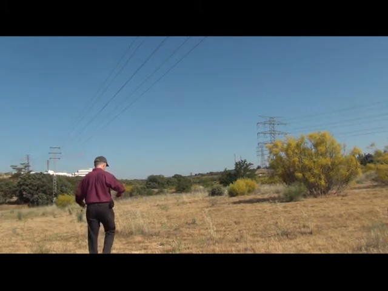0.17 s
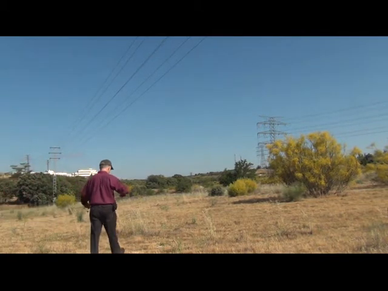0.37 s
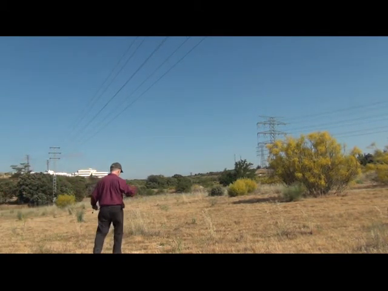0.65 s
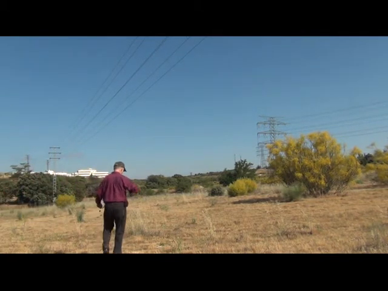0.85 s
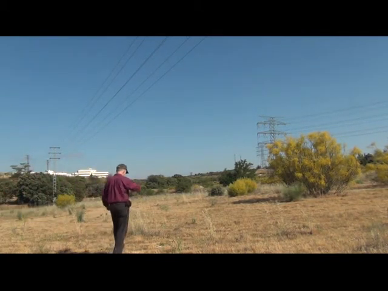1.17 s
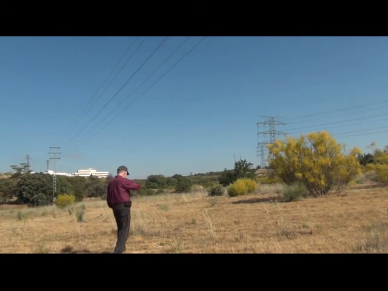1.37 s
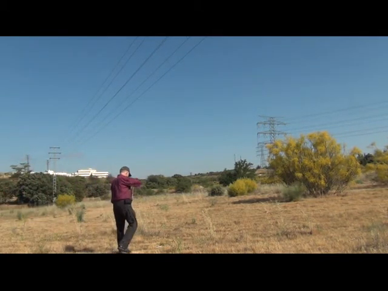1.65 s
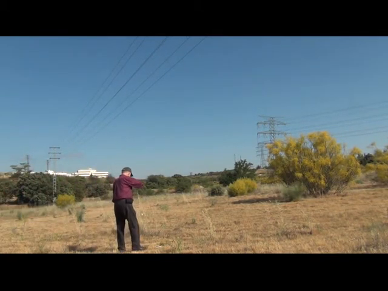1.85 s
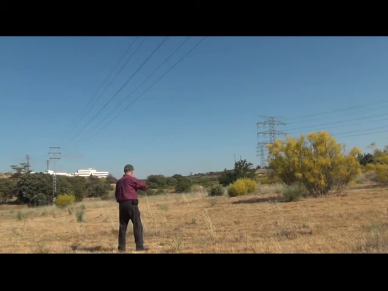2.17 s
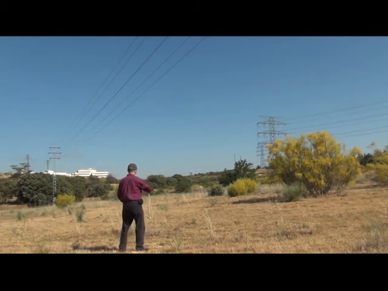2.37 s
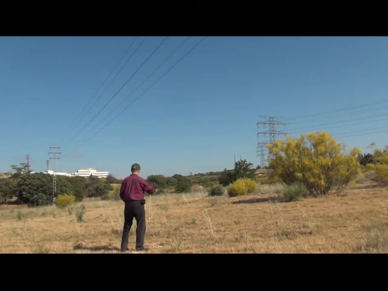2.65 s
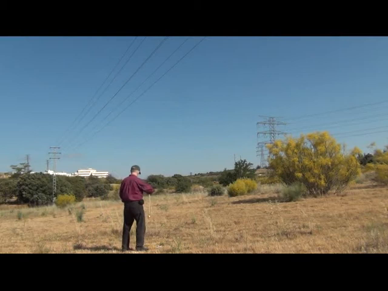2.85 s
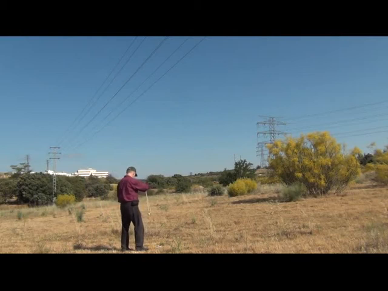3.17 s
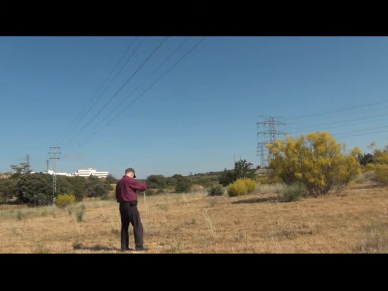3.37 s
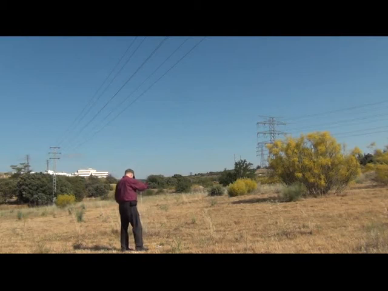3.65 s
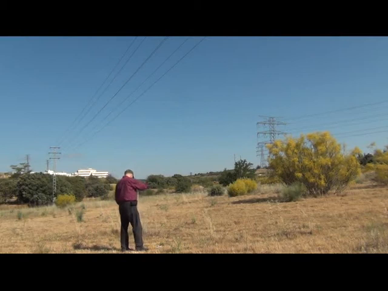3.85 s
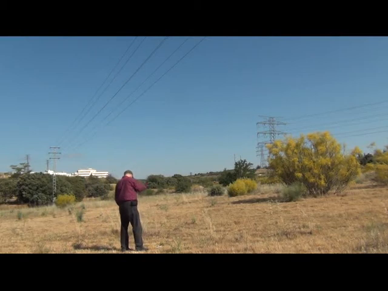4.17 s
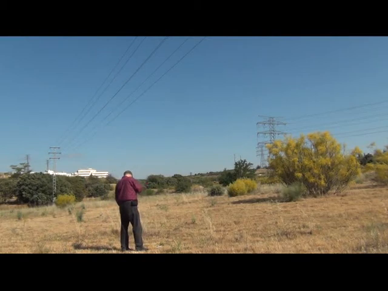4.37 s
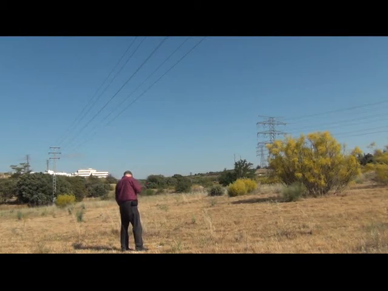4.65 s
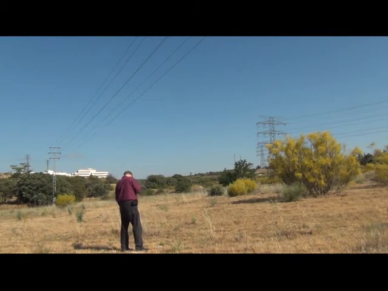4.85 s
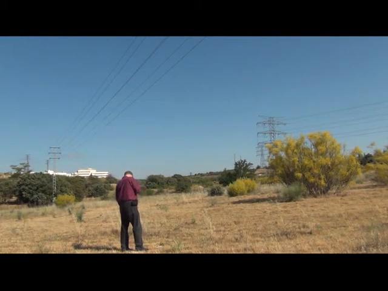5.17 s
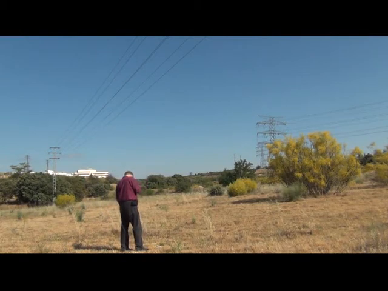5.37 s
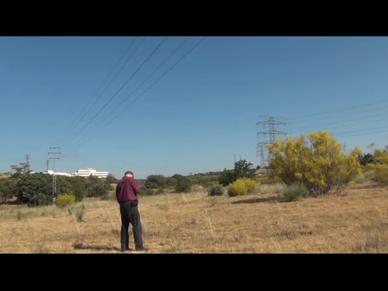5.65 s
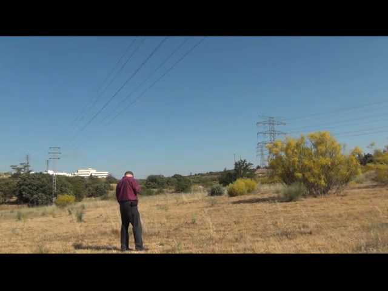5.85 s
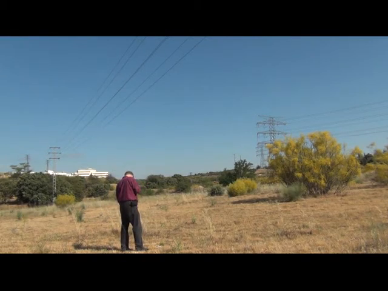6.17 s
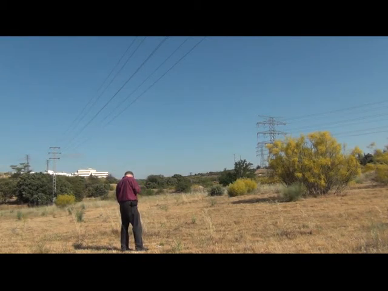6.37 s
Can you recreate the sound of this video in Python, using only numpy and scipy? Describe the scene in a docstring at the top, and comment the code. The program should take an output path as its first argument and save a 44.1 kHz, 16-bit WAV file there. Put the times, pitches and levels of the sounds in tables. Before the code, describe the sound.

A man walks away over dry straw, faint brushing and snapping stalks, with small bird slurs and whistles. He halts and raises his arms. A breeze rumbles, then two loud dry gunshots burst on the left, crackling reflections spreading to the centre and fading across the open field. Low, fluttering gusts buffet the unsheltered stereo microphone, with brief bird chirps beneath.

```python
"""Over far country murmur, hiss and a faint electronic whistle, a walker's steps swish and snap in dry grass.
A small bird sings a phrase of slurs and whistles, then chirps here and there: gliding, rasping sines.
Two gunshots crack from the left: filtered shocks, each answered by noise clumps and echoes at set delays
off scrub, trees and a far slope. Wind, heard throughout as shaped noise, buffets the stereo microphone
hardest after the shots, with pressure dips of single eddies."""
import sys
import numpy as np
from scipy import signal
from scipy.fft import rfft, irfft, next_fast_len
from scipy.io import wavfile
from scipy.ndimage import map_coordinates

SR = 44100
rng = np.random.default_rng(int(sys.argv[2]) if len(sys.argv) > 2 else 0)


def store_wav(level_fs):
    """Save 16-bit WAV to argv[1]."""
    pcm = np.round(np.clip(np.atleast_2d(level_fs), -1, 1) * 32767)
    wavfile.write(sys.argv[1], SR, pcm.T.astype(np.int16))


N = 287532
TIME = np.arange(N) / SR


def amp(db):
    """Decibels to gain."""
    return 10 ** (np.asarray(db) / 20)


def unit(x):
    """Scale to rms 1."""
    return x / np.sqrt(np.mean(x ** 2) + 1e-20)


def along(points, hz):
    """Read (Hz, value) points on a log axis."""
    f, v = np.transpose(points)
    return np.interp(np.log(hz + 1), np.log(f + 1), v)


def curves(rows):
    """One value per sample for each column after the time."""
    s, *cols = np.transpose(rows)
    return [np.interp(TIME, s, c) for c in cols]


def wobble(rate_hz):
    """A smooth random curve, rate_hz knots a second."""
    knots = rng.standard_normal(int(N * rate_hz / SR) + 4)
    return map_coordinates(knots, [TIME * rate_hz])


def swell(peak_s, half_s, db):
    """Power of one bell-shaped swell."""
    return amp(db) ** 2 * np.exp(-((TIME - peak_s) / half_s) ** 2)


def filtered(x, response):
    """x times a complex response of frequency."""
    m = next_fast_len(x.shape[-1] + 8192, True)
    spectrum = rfft(x, m) * response(np.fft.rfftfreq(m, 1 / SR))
    return irfft(spectrum, m)[..., :x.shape[-1]]


def noise(spectrum, size, grain_db=0):
    """Coloured noise of rms 1; grain_db makes single wavelets stand out."""
    white, sizes = rng.standard_normal((2, size))
    return unit(filtered(white * amp(grain_db * sizes), lambda hz: amp(along(spectrum, hz))))


def wide(spectrum, alike):
    """Stereo noise of rms 1; the mid-side balance sets the left-right likeness at each frequency."""
    def response(hz):
        turn = np.arccos(np.clip(along(alike, hz), -1, 1)) / 2
        return amp(along(spectrum, hz)) * [np.cos(turn), np.sin(turn)]

    mid, side = filtered(rng.standard_normal((2, N)), response)
    return unit(np.array([mid + side, mid - side]))


def add(track, s, x):
    """Mix x into track from second s on."""
    start = max(round(s * SR), 0)
    part = track[..., start:start + x.shape[-1]]
    part += x[..., :part.shape[-1]]


def background():
    """Far country murmur and microphone hiss as stereo noise, and a thin electronic whistle as a sine."""
    # Spectrum of murmur and hiss. Each row: frequency in Hz, relative density in dB.
    air_spectrum = [(15, -32), (25, -8), (103, 1.5), (196, -6), (293, -6), (373, -8), (415, -6), (488, -7),
                    (529, -6.5), (655, -5.5), (927, -5.5), (2240, -14.5), (15000, -22.5)]
    # Slow swell of the air noise. Each row: time in seconds, gain in dB.
    air_swell = [(0, 2), (1.4, 1.5), (2.2, 0), (3, 0.5), (6.5, 4)]
    # Likeness of the two ports in still air. Each row: frequency in Hz, correlation (0 to 1).
    air_alike = [(60, 1), (180, 0.94), (550, 0.64), (1650, 0.44), (4970, 0.5), (15000, 0.79)]
    air_db, whistle_rms_db, whistle_hz = -56, -72, 15625
    air = amp(air_db + curves(air_swell)[0]) * wide(air_spectrum, air_alike)
    whistle = amp(whistle_rms_db) * np.sqrt(2) * np.sin(2 * np.pi * whistle_hz * TIME)
    return air + whistle


def wind():
    """Turbulence at the ports: a rumble that rises in pitch with the wind, a higher flutter, single eddies."""
    # Wind on the microphone. Each row: time in seconds, strength in dB.
    strength_rows = [(0.0, -51), (1.6, -66), (2.32, -69), (3.1, -63), (3.3, -49.5), (3.7, -54.5),
                     (3.9, -43), (4.56, -44.5), (4.78, -38), (5.23, -44), (5.76, -37), (6.52, -42)]
    # Gusts. Each row: peak in seconds, half-length in seconds, rumble level in dB, flutter level in dB.
    gusts = [(0.542, 0.013, -45.5, -70), (.98, 0.022, -53, -75), (3.134, 0.017, -36, -68),
             (5.025, 0.017, -35.5, -36.5), (5.167, 0.015, -38, -38), (5.444, 0.057, -40, -41),
             (5.665, 0.081, -41, -37), (5.821, 0.041, -28.5, -26), (6.015, 0.046, -37, -37.5),
             (6.182, 0.032, -34.5, -43.5), (6.342, 0.058, -30, -31)]
    # Rumble in a light breeze. Each row: frequency in Hz, relative density in dB.
    slow_spectrum = [(20, -4.5), (45, 3.5), (70, 2), (110, -9.5), (160, -15), (300, -48), (700, -80)]
    # Rumble in a gust. Each row: frequency in Hz, relative density in dB.
    fast_spectrum = [(20, -21), (45, -3), (70, -2.5), (115, 1), (160, -13), (300, -47), (700, -82)]
    # Flutter. Each row: frequency in Hz, relative density in dB.
    flutter_spectrum = [(60, -27), (130, 5.5), (190, 3.5), (270, -5), (400, -17), (700, -25.5), (1500, -58),
                        (4000, -68)]
    # Likeness of the turbulence at the two ports. Each row: frequency in Hz, correlation (0 to 1).
    wind_alike = [(60, 0.99), (120, 0.82), (220, 0.53), (400, 0.063)]
    # Eddies that thump the microphone. Each row: time in seconds, mean peak level in dB, pitch in Hz.
    eddies = [(5.176, -23, 92), (5.722, -12.5, 189), (5.76, -15, 240), (5.8, -30, 230), (5.834, -18, 110),
              (5.94, -21.5, 155), (6.196, -32.5, 450), (6.274, -25, 248), (6.321, -24.5, 236)]
    fresh_db, flutter_growth = -49, 1.34  # a fresh breeze; the flutter grows faster than the rumble
    rumble_offset_db, flutter_offset_db = 0, -11.5  # over the strength, at fresh_db
    calm_db, speed_range_db = -53.5, 14.5  # the rumble rises in pitch from calm_db on, over this range

    strength_db, = curves(strength_rows)
    low = amp(strength_db + rumble_offset_db) ** 2
    low += sum(swell(s, half, db) for s, half, db, _ in gusts)
    high = amp(fresh_db + flutter_offset_db + flutter_growth * (strength_db - fresh_db)) ** 2
    high += sum(swell(s, half, db) for s, half, _, db in gusts)
    rumble_db, flutter_db = 10 * np.log10([low, high])

    speed = np.clip((rumble_db - calm_db) / speed_range_db, 0, 1)
    lumps = wobble(28)
    rumble = np.sqrt(1 - speed) * wide(slow_spectrum, wind_alike)
    rumble += np.sqrt(speed) * wide(fast_spectrum, wind_alike)
    out = amp(rumble_db + 0.96 * lumps) * rumble
    out += amp(flutter_db + 2 * lumps) * wide(flutter_spectrum, wind_alike)

    u = TIME[:SR // 10] - 1 / 20
    for s, db, hz in eddies:
        # a vortex core passes: a dip in pressure between two rises, unequal at the two ports
        q = (2 * hz * u) ** 2
        suction = (3 * q - 1) / (1 + q) ** 3
        add(out, s + u[0], amp(db + rng.normal(0, 2.4, (2, 1))) * suction)
    return out


def steps():
    """Dry grass swishes round the legs as grainy noise; stalks snap as noise bursts with a hollow knock."""
    # Strokes of a leg through the stalks. Each row: peak in seconds, half-length in seconds, level in dB.
    strides = [(0.096, 0.022, -58), (.23, 0.019, -64), (.325, 0.0087, -51.5), (.47, 0.086, -62),
               (.625, 0.039, -59.5), (0.812, 0.03, -53), (1.15, 0.068, -60.5), (1.42, .1, -66),
               (1.907, 0.11, -61.5)]
    # Snapping stalks. Each row: time in seconds, tearing-fibre level in dB, stem-knock level in dB.
    snaps = [(.0984, -54, -64), (.3134, -56, -41.5), (0.339, -57, -68), (.6425, -54, -66),
             (.8046, -54, -66), (.9068, -60, -66), (1.0023, -55, -66), (1.437, -62, -70)]
    # Rustle of straw. Each row: frequency in Hz, relative density in dB.
    straw_spectrum = [(1000, 3.5), (4000, -3), (7000, 3), (10000, 11), (13000, 6), (16000, -20)]
    # Knock of a hollow stem. Each row: frequency in Hz, relative density in dB.
    stalk_spectrum = [(400, -18), (1100, 0), (2300, 13), (2900, -24), (6000, -35)]
    # brushing of the legs: level, fade with distance, and the moment the walker stops
    swish_db, swish_fade_db_per_s, stop_s = -64.5, 3, 2.25
    break_db = 11.5  # the instant of breaking, over the tearing fibres

    brushing = amp(swish_db - swish_fade_db_per_s * TIME) * np.clip((stop_s - TIME) / .072, 0, 1)
    level = np.sqrt(brushing ** 2 + sum(swell(*stride) for stride in strides))
    out = level * np.array([noise(straw_spectrum, N, grain_db=5)] * 2)
    t = TIME[:SR // 5]
    for s, fibre_db, knock_db in snaps:
        decay = np.exp(-t / .01) + amp(break_db) * np.exp(-t / .0007)
        fibres = noise(straw_spectrum, len(t), grain_db=3) * decay
        knock = noise(stalk_spectrum, len(t)) * np.exp(-t / 0.0024)
        add(out, s, amp(fibre_db) * fibres + amp(knock_db) * knock)
    return out


def note(length_s, start_hz, end_hz, db, rasp):
    """One gliding bird note; a fast waver of the pitch makes it rasp."""
    u = np.linspace(0, 1, int(length_s * SR))
    waver = np.interp(u * length_s * 800, np.arange(800), rng.standard_normal(800))  # 800 knots/s
    hz = (start_hz + (end_hz - start_hz) * u) * (1 + rasp * waver)
    return amp(db) * np.sin(np.pi * u) * np.sin(2 * np.pi * np.cumsum(hz) / SR)


def bird():
    """Distant small birds: a quick phrase of like syllables, then chirps, blurred by a scrub noise tail."""
    # Song syllables, each a downward slur and a short whistle. Each row: start in seconds, slur's top in Hz,
    # slur's relative level in dB, whistle's start in Hz, its end in Hz, its relative level in dB.
    syllables = [(.605, 3760, -57.5, 3620, 3750, -51.5), (.748, 3520, -55, 3590, 3520, -50.5),
                 (.895, 3480, -54.5, 3570, 3500, -50), (1.039, 3300, -52.5, 3120, 3530, -54),
                 (1.176, 3370, -52.5, 2930, 3400, -55)]
    # Single chirps and buzzes. Each row: start in seconds, length in seconds, start pitch in Hz,
    # end pitch in Hz, relative level in dB, rasp as a share of the pitch.
    chirps = [(1.097, 0.6, 4470, 4170, -62, 0.15), (1.368, 0.056, 2460, 2890, -56, 0.12),
              (1.507, 0.035, 3370, 2300, -50, 0.04), (1.629, 0.093, 2970, 3560, -55, 0.12),
              (1.687, .085, 3210, 2400, -59.5, .09), (2.634, 0.053, 3450, 3500, -62, .03),
              (5.76, .027, 4220, 4120, -56, .01), (5.8, .024, 3500, 3900, -54, .018),
              (5.867, 0.073, 2150, 2340, -48, 0.086), (5.914, 0.023, 3120, 3250, -48.5, 0.061),
              (6.372, .023, 3430, 3200, -55, .03)]
    slur_s, whistle_after_s, whistle_s = 0.0505, 0.042, 0.026
    slur_end, song_rasp = .84, 0.038  # shares of the pitch

    song = np.zeros(N)
    for s, top_hz, slur_db, start_hz, end_hz, whistle_db in syllables:
        add(song, s, note(slur_s, top_hz, slur_end * top_hz, slur_db, song_rasp))
        add(song, s + whistle_after_s, note(whistle_s, start_hz, end_hz, whistle_db, song_rasp / 2))
    for s, *shape in chirps:
        add(song, s, note(*shape))
    song *= amp(2.8 * wobble(90))  # the voice flutters within each note

    t = TIME[:SR // 2]
    tail = rng.standard_normal((2, len(t))) * amp(-60 * t / 1.3)  # 60 dB in 1.3 s
    tail /= np.linalg.norm(tail[0])
    blurred = signal.fftconvolve(song[None], tail, axes=1)[:, :N]
    return amp(-2) * song + amp(-5) * blurred


def blast(t, push_s, soft_hz, low_hz, damping):
    """A shock of peak 1: push, longer suction, and the swing of the microphone's bass cut."""
    def response(f):
        bass_cut = (1j * f) ** 2 / (low_hz ** 2 - f * f + 1j * f * low_hz * damping)
        return bass_cut / (1 + 1j * f / soft_hz) ** 4

    u = t / push_s
    wave = filtered((1 - u) * np.exp(-u), response)
    return wave / wave.max()


def from_left(x, shade, turn_hz=5000, width_hz=3000):
    """The right port is shaded, most in the upper midrange, and its phase turns over in the treble."""
    # Right port's response to sound from the left. Each row: frequency in Hz, gain in dB before shade.
    far_side = [(200, -2.5), (380, -1.5), (700, -5.5), (1300, -8.5), (2400, -8.5), (4400, -9), (8000, -2),
                (15000, 4)]

    def response(f):
        pole = turn_hz ** 2 - f * f + 1j * f * width_hz
        return amp(shade * along(far_side, f)) * np.conj(pole) / pole

    return np.array([x, filtered(x, response)])


def air_loss(hz, loss_db):
    """Gain of air and foliage that take loss_db at 10 kHz."""
    return amp(-loss_db * (hz / 10 ** 4) ** 0.91)


def travelled(x, air_db=24, reach_s=0.29):
    """The later an echo, the more treble it has lost, levelling off at air_db at 10 kHz."""
    hz, t, z = signal.stft(x, SR, nperseg=256)
    z = z * air_loss(hz[:, None], air_db * np.tanh(t / reach_s))
    return signal.istft(z, SR, nperseg=256)[1][:len(x)]


def muzzle(t):
    """The direct shock, its inverted bounce off the soft ground, and the crackle of the nearest stalks."""
    # Crackle of the nearest stalks. Each row: frequency in Hz, relative density in dB.
    crack_spectrum = [(60, -13), (300, 4.5), (800, -2), (1700, 14.5), (3000, -36), (5000, -12),
                      (10000, -20), (15000, -46)]
    shock = blast(t, push_s=0.0011, soft_hz=3080, low_hz=83, damping=0.5)
    bounce = blast(t, push_s=0.00039, soft_hz=4000, low_hz=196, damping=0.81)
    add(shock, .001, -amp(-4.0) * bounce)
    crackle = noise(crack_spectrum, len(t)) * np.exp(-t / 0.0069) * (1 - np.exp(-t / 0.00019))
    return from_left(shock + amp(-9) * crackle, shade=.8)


def scrub(t):
    """Strength of the scatter: the grass answers at once, the trees build up and then fade with distance."""
    grass_db, grass_fade_db_per_s = -22, 51
    # belt of trees: level and delay of its densest part, build-up before, loss per doubled delay after
    trees_db, trees_s, rise_db_per_s, spreading_db = -17, 0.17, 149, 12.5
    grass = amp(grass_db - grass_fade_db_per_s * t) * (t < trees_s)
    rise_db = rise_db_per_s * np.maximum(trees_s - t, 0)
    fade_db = spreading_db * np.log2(np.maximum(t / trees_s, 1))
    return np.hypot(grass, amp(trees_db - rise_db - fade_db))


def reflectors(t):
    """Hard faces return a softened copy of the shock, thickets a short cluster of scatter."""
    # Hard faces that mirror the shock. Each row: delay in seconds, level in dB.
    faces = [(0.1731, -10), (0.1751, -11.5), (.2108, -14.5), (.7215, -38), (.815, -32.5)]
    # Thickets. Each row: delay in seconds, level in dB, depth in seconds, treble loss at 10 kHz in dB.
    thickets = [(.107, -25, 0.0016, 13), (.123, -18.5, 0.0038, -1.5), (.133, -16.5, 0.0026, -3),
                (.183, -12, .001, 21), (.2095, -10, 0.0023, 24), (.262, -29, 0.002, 27),
                (.332, -27.5, 0.0096, 14), (.545, -39, 0.0067, 2), (.567, -39.5, 0.0048, 3),
                (.7205, -23, 0.0028, 9), (.7306, -30.5, 0.0063, 0), (.788, -33, .007, 16),
                (.815, -33.5, 0.0071, 33), (.866, -40, 0.0065, 26), (1.46, -49, 0.024, 5),
                (1.767, -42.5, 0.009, 30)]
    # Scatter of a thicket. Each row: frequency in Hz, relative density in dB.
    cluster_spectrum = [(100, -11), (350, -14), (600, 1), (1000, 4), (1900, -0.5), (2800, -7.5), (4200, -8),
                        (5500, -18.5), (8000, -32), (15000, -50)]
    out = np.zeros(len(t))
    u = t[:SR // 5] - 1 / 10
    pulse = blast(t[:SR // 20], push_s=.0007, soft_hz=3300, low_hz=120, damping=1.2)
    for delay, db in faces:
        add(out, delay - .0003, amp(db) * pulse)  # early, for the pulse's soft rise
    for delay, db, depth, loss_db in thickets:
        cluster = filtered(noise(cluster_spectrum, len(u)), lambda hz: air_loss(hz, loss_db))
        shape = np.exp(np.minimum(u / depth, -u / depth / 2))  # nearest branches first, the rest trails
        add(out, delay + u[0], amp(db) * cluster * shape)
    return out


def field(t, clumps):
    """Countless small echoes from the vegetation, arriving in clumps, and the single reflectors."""
    # Scatter close by. Each row: frequency in Hz, relative density in dB.
    scatter_spectrum = [(40, -15), (100, -8), (280, -16), (500, -9.5), (850, -2), (1200, -2.5), (1700, -2),
                        (2400, -3.5), (3300, -8), (4600, -14), (7000, -22.5), (10000, -27.5), (15000, -50)]
    # Scatter unlike in the two ports. Each row: frequency in Hz, relative density in dB.
    diffuse_spectrum = [(100, -4), (600, -7), (1700, 4), (3000, -2), (4300, -4), (6000, -5), (9000, -31),
                        (15000, -56)]
    size = len(t)
    # late echoes come from all round, so the image drifts to the middle
    around = np.clip((t - .17) / 0.57, 0, .55)
    level = scrub(t) * amp(1.1 * clumps[:size]) * (1 - np.exp(-t / 0.00085))
    crackle = noise(scatter_spectrum, size, grain_db=5)
    echo = level * travelled(crackle) + reflectors(t)
    image = (1 - around) * from_left(echo, shade=1.15) + around * echo
    diffuse = amp(-19 + 18 * around) * level * travelled(noise(diffuse_spectrum, size))
    return image + diffuse * np.array([[-1], [1]])


def shots():
    """Each shot sends its blast and wakes the same landscape: the same clumps and reflector delays."""
    # Shots. Each row: time in seconds, blast level in dB, echo gain in dB, shift of the echoes in seconds.
    firings = [(3.6984, -7.5, 0, 0), (4.5895, -9.5, 1.5, -.0012)]
    out, t = np.zeros((2, N)), TIME[:3 * SR]
    clumps = wobble(111.4)
    for s, blast_db, echo_db, shift in firings:
        add(out, s, amp(blast_db) * muzzle(t))
        echoes = field(t, clumps) * (t + shift > 0)  # no echo outruns the shock
        add(out, s + shift, amp(echo_db) * echoes)
    return out


def scene():
    """Everything that reaches the microphone, and the electronic whistle."""
    return background() + wind() + steps() + bird() + shots()


def record(dry):
    """The electronics round off the highest peaks and keep nothing above the band limit."""
    ceiling, top_hz = .7, 15850
    rounded = dry / (1 + (dry / ceiling) ** 6) ** (1 / 6)
    return filtered(rounded, lambda hz: hz < top_hz)


dry = scene()
out = record(dry)
store_wav(out)
```